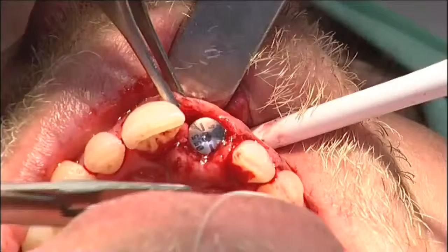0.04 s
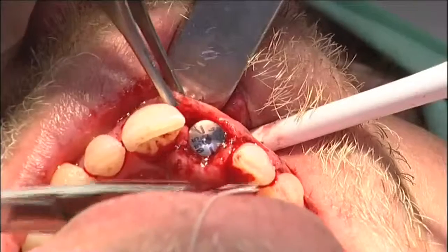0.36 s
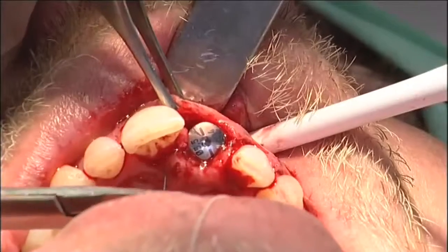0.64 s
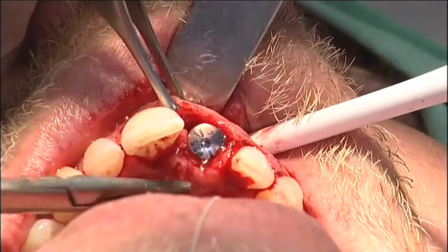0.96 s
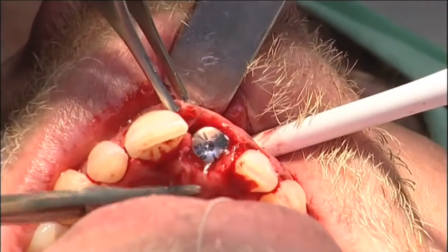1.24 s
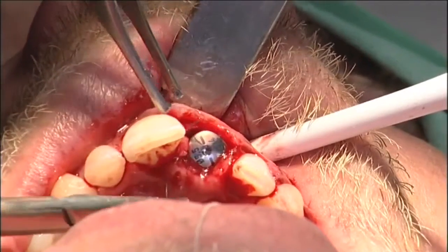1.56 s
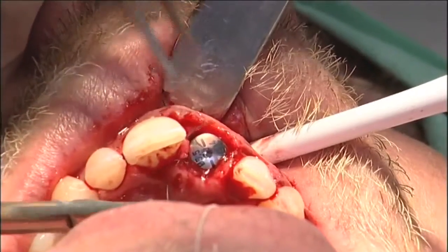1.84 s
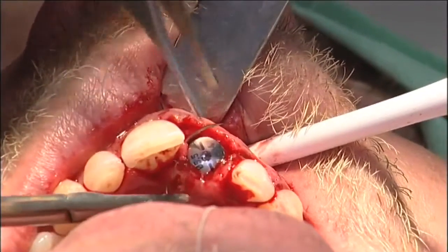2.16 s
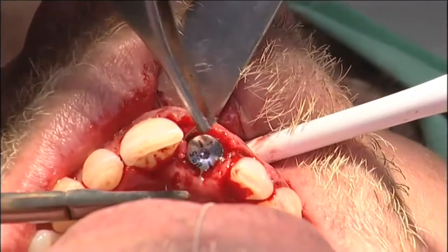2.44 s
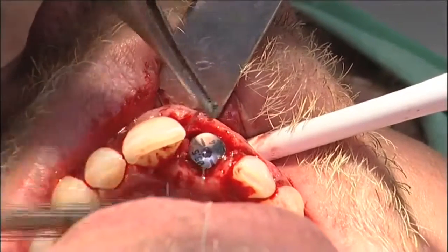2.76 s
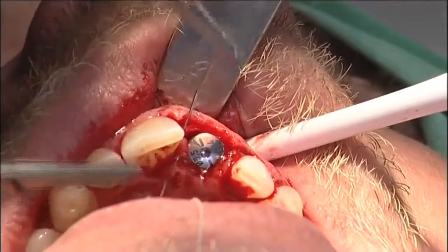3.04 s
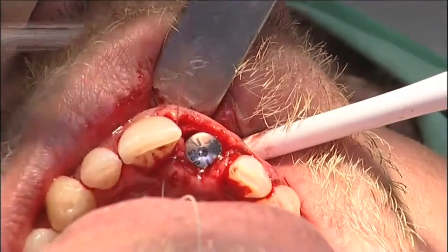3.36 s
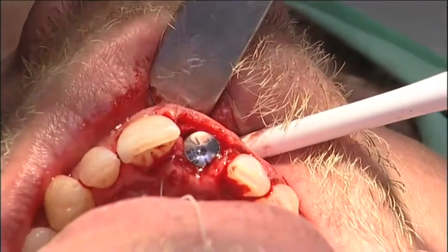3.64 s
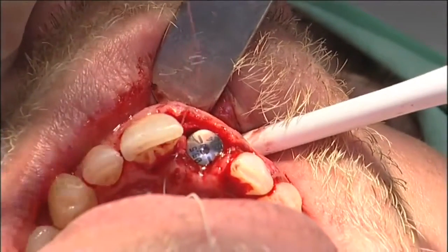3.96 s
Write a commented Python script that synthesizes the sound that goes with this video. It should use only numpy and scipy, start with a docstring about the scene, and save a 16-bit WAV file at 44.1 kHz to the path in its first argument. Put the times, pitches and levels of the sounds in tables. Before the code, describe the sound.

A thin dental suction tube hisses close up in an open mouth, sputtering fine droplets over a faint machine drone in the room. Later come a few tiny slurps and one brief whistle, then the hiss fades down.

```python
"""A steady hiss cuts in abruptly: a thin dental suction tube drawing air in an open mouth, close, mono.
The jet sputters through the tube's resonances and spits fine droplets. Air rushes and gulps in the
mouth and rings its hollow, while a machine drones in the room. Later, beads of liquid slurp into the
tube and the tip whistles once. The sound is faded down near the end."""
import sys
import numpy as np
from scipy import signal
from scipy.fft import rfft, irfft, next_fast_len
from scipy.io import wavfile
from scipy.ndimage import map_coordinates

SR = 44100
rng = np.random.default_rng(int(sys.argv[2]) if len(sys.argv) > 2 else 0)


def dump_mix(stems):
    """Bounce the given channels to the path in sys.argv[1] as a 16-bit WAV at rate SR."""
    frames = np.atleast_2d(stems).T  # one column per channel
    limited = np.clip(frames, -1, 1)  # hard clip at full scale
    pcm = np.round(limited * 32767).astype(np.int16)
    wavfile.write(sys.argv[1], SR, pcm)


N = 176400
TIME_S = np.arange(N) / SR

# Broad tube response. Each row: frequency in Hz, relative gain in dB.
TUBE_SPECTRUM = [(1300, -32), (1500, -29), (1700, -21.5), (2100, -16.5), (2550, -11.5), (2900, -12),
                 (3400, -13), (3700, -9.5), (4140, -1), (4560, -5.5), (4690, -15), (4900, -20),
                 (5050, -7.5), (5250, -11.5), (5620, -3.5), (6150, -8.5), (6370, -15), (6620, -15),
                 (6950, -6.5), (7260, -3), (7600, -7.5), (8000, -6.5), (8170, -14), (8450, -8),
                 (8850, -11.5), (10400, -10.5), (11200, -13.5), (15700, -23)]


def amp(db):
    """Decibels to gain."""
    return 10 ** (np.asarray(db) / 20)


def unit(x):
    """Scale to rms 1."""
    return x / np.sqrt(np.mean(x ** 2) + 1e-20)


def noise():
    """White turbulence."""
    return rng.standard_normal(N)


def curves(rows):
    """One per-sample curve for each column after the time."""
    times_s, *columns = np.transpose(rows)
    return [np.interp(TIME_S, times_s, column) for column in columns]


def wobble(knots_per_s):
    """Smooth random curve, rms 1."""
    knots = rng.standard_normal(N // 8)
    return unit(map_coordinates(knots, [TIME_S * knots_per_s], mode="wrap"))


def filtered(x, response):
    """Zero-phase filter with gain response(hz)."""
    size = next_fast_len(N + SR // 2)
    return irfft(rfft(x, size) * response(np.fft.rfftfreq(size, 1 / SR)), size)[:N]


def coloured(x, spectrum):
    """Shape x by (Hz, dB) points, cut off outside them; rms 1."""
    points_hz, points_db = np.transpose(spectrum)

    def gain(hz):
        return amp(np.interp(np.log(hz + 1), np.log(points_hz + 1), points_db, left=-120, right=-120))
    return unit(filtered(x, gain))


def resonant(x, modes):
    """Pass x through steep resonances; rms 1."""
    def gain(hz):
        return np.sqrt(sum(amp(db) ** 2 / (1 + ((hz - centre_hz) / width_hz) ** 2) ** 3
                           for centre_hz, width_hz, db in modes))
    return unit(filtered(x, gain))


def droplets(hits_per_s=430, spread_db=6.5):
    """Tiny random spray impacts, a few much larger than the rest."""
    hits = rng.random(N) < hits_per_s / SR
    sizes = amp(spread_db * np.minimum(rng.exponential(size=N), 4))
    return unit(hits * sizes * np.sign(noise()))


def suction_jet():
    """The sputtering jet and its spray sound through the tube, with treble fizz on top."""
    # Air flow at the tip and fizz. Each row: time in seconds, relative level in dB.
    flow_levels = [(0.28, -37), (0.35, -36.5), (1.78, -37), (1.84, -34), (2.1, -36), (2.32, -35),
                   (2.43, -38), (2.44, -35), (2.99, -36.5), (3.04, -35.5), (3.1, -37.5)]
    fizz_levels = [(.28, -39.5), (.33, -38), (.43, -43), (.47, -39.5), (.69, -40), (.76, -41.5),
                   (.89, -39.5), (.93, -43.5), (1.25, -41), (1.35, -47.5), (1.8, -47.5), (1.85, -41.5),
                   (1.98, -46.5), (2.13, -48), (2.29, -41.5), (2.41, -48), (2.54, -39.5), (2.78, -44),
                   (3.02, -40), (3.12, -47), (3.26, -43), (3.6, -46.5), (3.85, -41.5)]
    # Fizz band. Each row: frequency in Hz, relative gain in dB.
    fizz_spectrum = [(8000, -24), (11200, -8), (12300, -.5), (15700, 0)]
    # Narrow tube resonances. Each row: centre in Hz, width in Hz, relative gain in dB.
    tube_modes = [(2606, 67, -10), (3850, 93, -0.5), (4166, 153, 2.5), (4400, 61, 2), (4540, 47, -2),
                  (5077, 80, -9), (5390, 60, -5), (5520, 80, 0), (5900, 60, -4), (6220, 100, -5.5),
                  (7160, 140, -3.5), (7900, 90, -25), (9000, 74, -7)]
    flow_db, = curves(flow_levels)
    fizz_db, = curves(fizz_levels)
    sputter = amp(0.59 * wobble(300) + 0.54 * wobble(40))
    spray = amp(-15) * droplets()
    hiss = amp(-0.5) * coloured(sputter * noise() + spray, TUBE_SPECTRUM)
    rings = amp(-7.5) * resonant(noise(), tube_modes)
    flicker_db = 0.28 * wobble(25)
    fizz = amp(1.5 + flicker_db) * coloured(sputter * noise() + spray, fizz_spectrum)
    return amp(flow_db) * (hiss + rings) + amp(fizz_db) * fizz


def mouth(gulp_width_s=0.014):
    """Air rushes through the mouth, gulps now and then, and rings its hollow."""
    # Low rush and ringing hollow. Each row: time in seconds, relative level in dB.
    rush_levels = [(0.28, -56.5), (0.37, -57.5), (0.43, -52), (0.48, -56.5), (1.25, -56.5), (1.3, -60),
                   (1.61, -56.5), (1.71, -60.5), (1.73, -55.5), (1.76, -56.5), (2.1, -61.5), (2.43, -57.5),
                   (2.44, -55.5), (3.06, -59.5)]
    hollow_levels = [(.28, -50), (.69, -48), (.85, -48), (1.03, -46), (1.12, -55), (1.19, -45.5),
                     (1.25, -51), (1.46, -49.5), (1.51, -49), (1.6, -50.5), (1.79, -47), (1.9, -50),
                     (2.07, -48.5), (2.15, -54), (2.26, -51), (2.4, -46), (2.52, -44.5), (2.69, -51.5),
                     (2.81, -43.5), (3.06, -50), (3.12, -46.5), (3.19, -48), (3.45, -48), (3.66, -51.5)]
    # Rush band. Each row: frequency in Hz, relative gain in dB.
    rush_spectrum = [(200, -50), (320, -9.5), (520, -6.5), (640, -4.5), (700, 2.5), (830, 2.5), (940, 0),
                     (995, -9), (1070, -0.5), (1300, -17), (1480, -30), (1700, -33)]
    # Hollow and gulp resonances. Each row: centre in Hz, width in Hz, relative gain in dB.
    hollow_modes = [(1063, 29, -6), (1155, 46, -2), (1226, 35, -4), (1292, 32, 2), (1336, 59, -7)]
    gulp_modes = [(796, 100, 0)]
    # Short gulps. Each row: peak time in seconds, peak level in dB.
    gulp_peaks = [(.43, -60), (.875, -50.5), (1.735, -50.5)]
    rush_db, = curves(rush_levels)
    hollow_db, = curves(hollow_levels)
    gulp_envelope = sum(amp(db) * np.exp(-((TIME_S - peak_s) / gulp_width_s) ** 2)
                        for peak_s, db in gulp_peaks)
    gulps = gulp_envelope * resonant(noise(), gulp_modes)
    rush = amp(rush_db + 1.5) * coloured(noise(), rush_spectrum)
    hollow = amp(hollow_db - 3) * resonant(noise(), hollow_modes)
    return rush + gulps + hollow


def machine(drone_db=-63, drift_rad=0.25):
    """Equipment in the room hums over a low noise drone."""
    # Hum tones. Each row: frequency in Hz, rms level in dB.
    hum_tones = [(57, -74.5), (150, -71)]
    # Drone band. Each row: frequency in Hz, relative gain in dB.
    drone_spectrum = [(20, -5), (38, -23), (56, 2), (70, -4.5), (110, 2), (128, -4), (165, -15),
                      (200, -5.5), (225, -10), (246, -3.5), (275, -12.5), (310, -1.5), (400, -15),
                      (700, -16)]
    hum = sum(amp(db) * np.sqrt(2) * np.sin(2 * np.pi * hz * TIME_S + drift_rad * wobble(2.9))
              for hz, db in hum_tones)
    return hum + amp(drone_db) * coloured(noise(), drone_spectrum)


def slurps(decay_s=0.0044):
    """Each bead of liquid entering the tube gives a brief noise burst."""
    # Beads. Each row: start in seconds, peak level in dB.
    beads = [(1.883, -28), (2.458, -28), (2.672, -29), (2.747, -34), (3.176, -36)]
    envelope = sum(amp(db) * (TIME_S >= start_s) * np.exp(-np.abs(TIME_S - start_s) / decay_s)
                   for start_s, db in beads)
    return envelope * coloured(noise(), TUBE_SPECTRUM)


def whistle(width_hz=81):
    """A breathy edge tone at the tip slides down; faint outside its one swell."""
    # Glide. Each row: time in seconds, pitch in Hz, level in dB.
    glide = [(2.08, 2970, -62), (2.17, 2950, -50), (2.25, 2970, -49), (2.31, 2870, -47), (2.36, 2700, -51),
             (2.40, 2620, -68)]
    pitch_hz, level_db = curves(glide)
    phase = 2 * np.pi * np.cumsum(pitch_hz) / SR
    noise_band = wobble(2 * width_hz) * np.cos(phase) + wobble(2 * width_hz) * np.sin(phase)
    return amp(level_db) * unit(noise_band)


def near_reflections(x, count=14, min_delay_s=0.003, max_delay_s=0.025, echo_to_direct_db=-12):
    """Weak early reflections from the face, tray and lamp comb the hiss."""
    delays_s = rng.uniform(min_delay_s, max_delay_s, count)
    strengths = rng.standard_normal(count)
    gains = amp(echo_to_direct_db) * strengths / np.linalg.norm(strengths)
    response = np.bincount((delays_s * SR).astype(int), gains)
    response[0] = 1  # direct path
    return signal.fftconvolve(x, response / np.linalg.norm(response))[:N]


def scene():
    """One microphone feeds both channels."""
    mono = near_reflections(suction_jet() + slurps()) + mouth() + whistle() + machine()
    return np.array([mono, mono])


def record(dry):
    """Abrupt cut-in, late partial fade, steep low-pass."""
    start_s, fade_span_s, fade_db = 0.2577, [3.134, 3.64], -10.5
    top_hz, skirt_hz = 15800, 100
    fader = (TIME_S >= start_s) * amp(np.interp(TIME_S, fade_span_s, [0, fade_db]))

    def low_pass(hz):
        return np.clip((top_hz - hz) / skirt_hz + 1, 0, 1)
    return np.array([filtered(channel * fader, low_pass) for channel in dry])


dry = scene()
out = record(dry)
dump_mix(out)
```